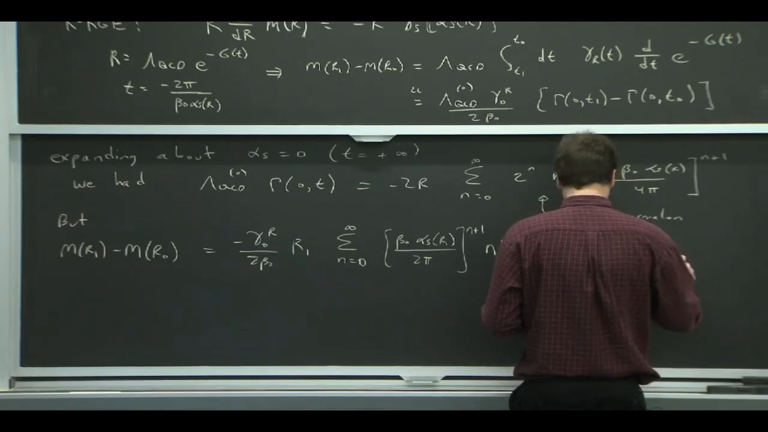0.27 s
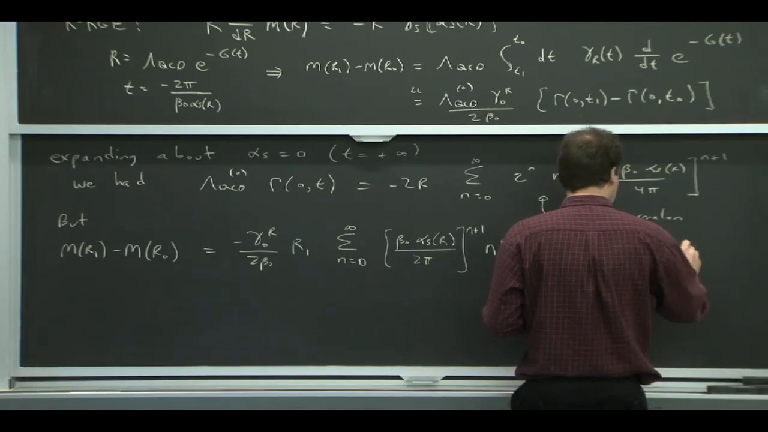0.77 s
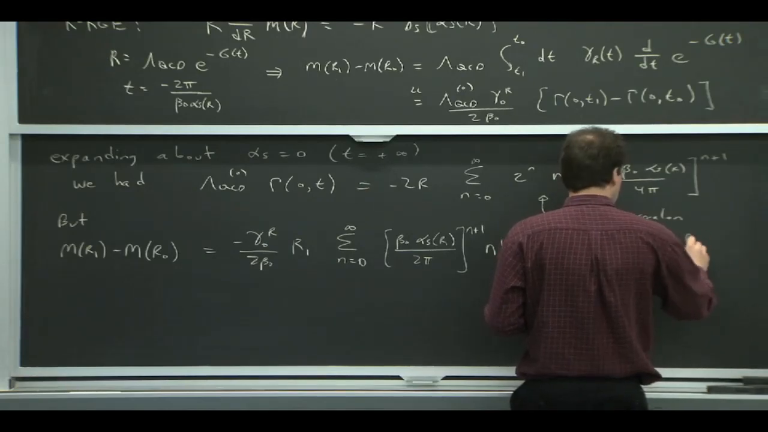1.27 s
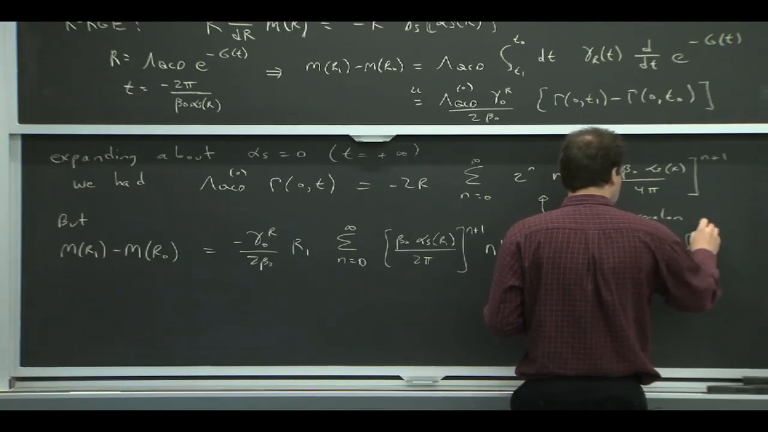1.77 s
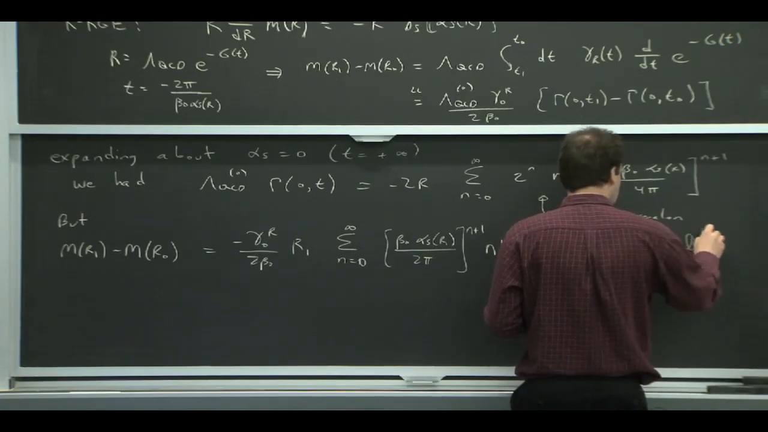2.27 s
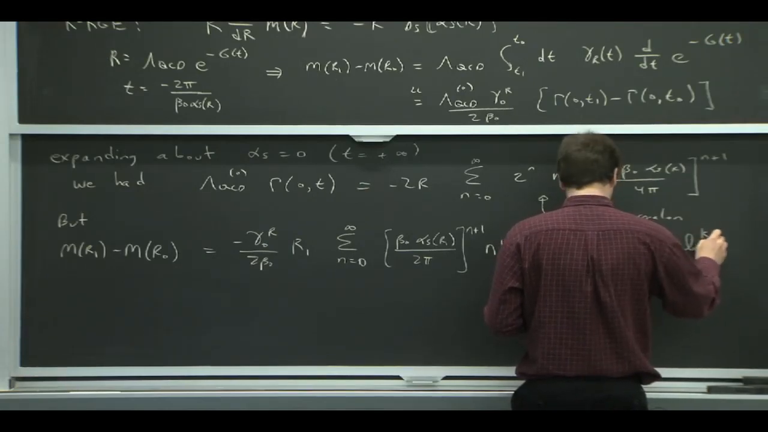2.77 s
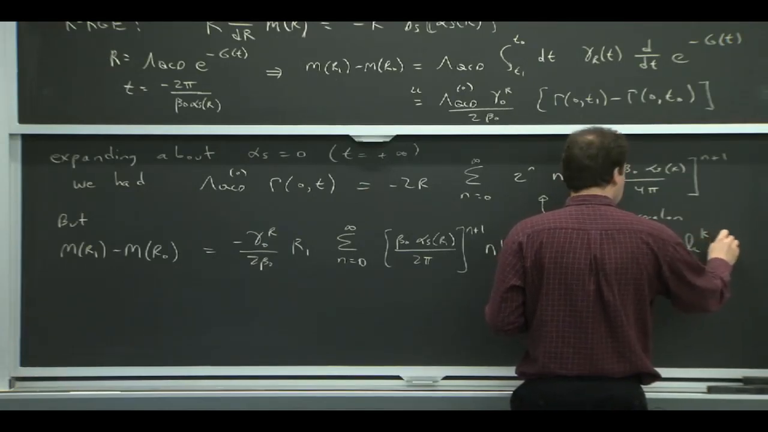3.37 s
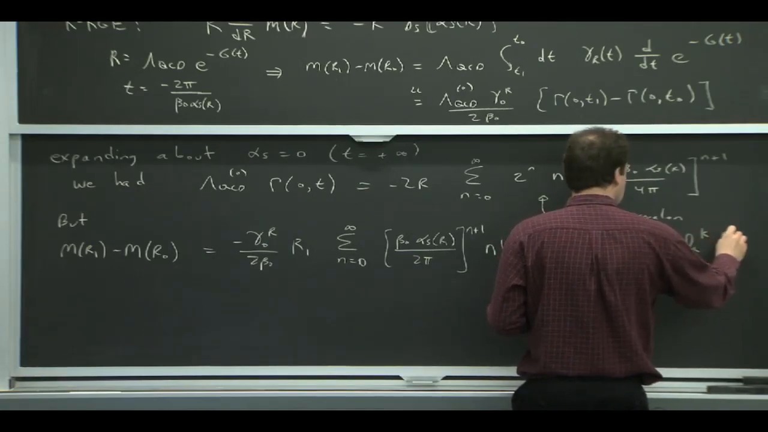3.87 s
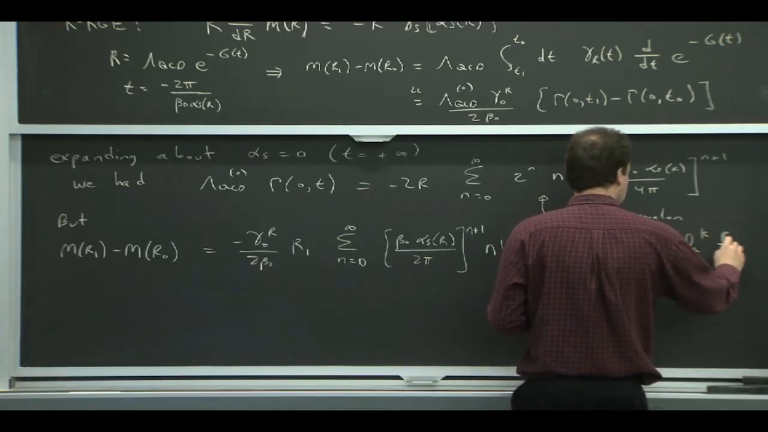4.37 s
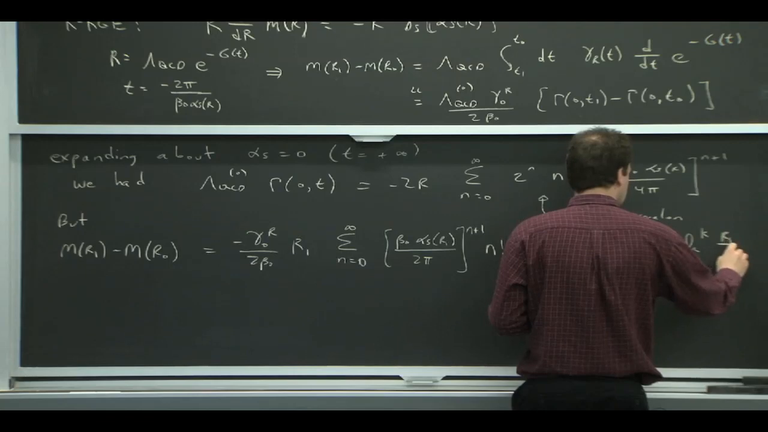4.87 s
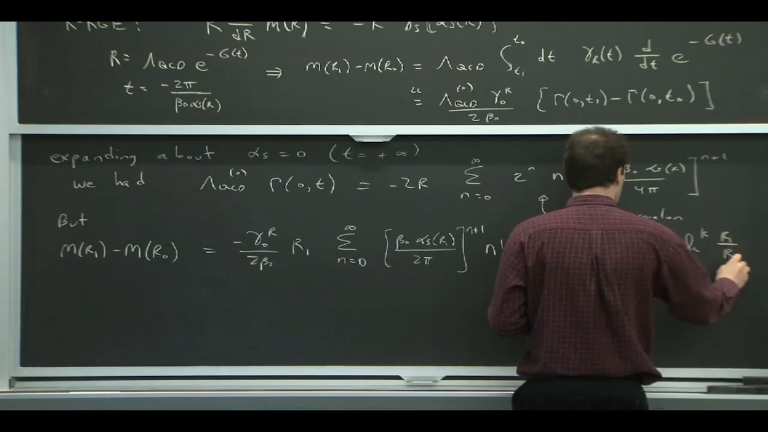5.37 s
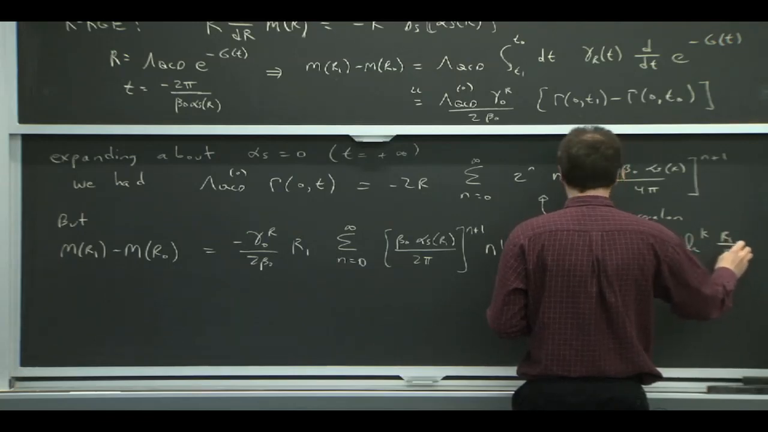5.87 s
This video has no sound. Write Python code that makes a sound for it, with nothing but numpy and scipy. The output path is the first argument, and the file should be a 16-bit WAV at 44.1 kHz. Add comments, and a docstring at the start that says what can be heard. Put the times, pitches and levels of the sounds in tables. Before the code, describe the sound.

Soft ventilation rumble with a faint, low wavering hum runs throughout a quiet lecture room. Right at 0 s chalk lands on a large blackboard with a loud, full, hollow knock, the panel shuddering briefly and the room giving a short tail. Quiet until a weaker tap at 0.85 s, followed by faint dry scraping strokes to about 1.65 s, with a low judder beneath. Two crisp knocks come at 1.86 and 2.1 s, each with a short soft rasp, ending near 2.3 s. After a pause, a brighter tap at 3.26 s leads into scratches with a tiny squeak, until 3.8 s. Knocks at 3.9, 4.13 (the loudest of this group) and 4.4 s each drag into short gritty strokes; small quick rasps continue to 5.2 s. Then only barely audible powdery brushes near 5.5 and 6.05 s over the ventilation.

```python
"""Ventilation hums softly in a quiet lecture room, and a stick of chalk knocks on a large blackboard.
The stick lands several times, each knock a filtered click with panel rings, shudder and gritty hiss.
Between landings it rasps through short strokes: random tiny slips, coloured and mixed with powder hiss.
Brief judders and squeaks are noise through narrow resonances; the room answers with a short tail.
The ventilation is coloured noise with one wavering hum."""
import sys
import numpy as np
from scipy import signal
from scipy.fft import rfft, irfft
from scipy.io import wavfile
from scipy.ndimage import uniform_filter1d

SR = 44100
rng = np.random.default_rng(int(sys.argv[2]) if len(sys.argv) > 2 else 0)


def to_wav(s):
    """Save 16-bit WAV."""
    ch = np.atleast_2d(s).T  # columns
    pcm = np.round(np.clip(ch, -1, 1) * 32767)  # PCM
    wavfile.write(sys.argv[1], SR, pcm.astype(np.int16))


N = 270333

# How long the lecture room rings. Each row: frequency in Hz, time to fall by 60 dB in seconds.
ROOM_DECAY = [(120, 0.72), (400, .5), (1000, 0.48), (3000, 0.45), (7000, 0.5), (14000, 0.16)]


def amp(db):
    """Decibels to gain."""
    return 10 ** (np.asarray(db) / 20)


def evened(x):
    """Scales to rms 1."""
    return x / np.sqrt(np.mean(x ** 2) + 1e-20)


def read(points, hz):
    """Reads a table on a log-frequency axis."""
    f, value = np.transpose(points)
    return np.interp(np.log(hz + 1), np.log(f + 1), value)


def add(mix, s, sound):
    """Mixes a sound in at time s, in seconds."""
    part = mix[max(round(s * SR), 0):][:len(sound)]
    part += sound[:len(part)]


def coloured(x, points):
    """Shapes the spectrum of x by the gains in points."""
    spectrum = rfft(x)
    gain = amp(read(points, np.fft.rfftfreq(len(x), 1 / SR)))
    return irfft(spectrum * gain, len(x))


def resonate(x, hz, width_hz):
    """One resonance with gain 1 at its peak."""
    b, a = signal.iirpeak(hz, hz / width_hz, fs=SR)
    return signal.lfilter(b, a, x)


def sing(x, hz, width_hz):
    """A steep resonance driven by x, made of two peaks in series, at rms 1."""
    narrow = resonate(x, hz, width_hz)
    return evened(resonate(narrow, hz, 2 * width_hz))


def ventilation(air_db=-54, hum_hz=113, hum_filter_width_hz=20, hum_db=-57.5):
    """Air rumbles in the ducts, with one wavering hum: noise through the same resonance twice."""
    # Colour of the duct air. Each row: frequency in Hz, relative level in dB.
    air_colour = [(15, -30.5), (35, -4), (55, -4.5), (100, 0), (160, -6), (220, -10), (300, -12.5),
                  (400, -20), (600, -26.5), (1000, -32.5), (2000, -39.5), (5000, -44), (14000, -49.5),
                  (14700, -66)]
    air = evened(coloured(rng.standard_normal(N), air_colour))
    hum = resonate(rng.standard_normal(N), hum_hz, hum_filter_width_hz)
    hum = evened(resonate(hum, hum_hz, hum_filter_width_hz))
    return amp(air_db) * air + amp(hum_db) * hum


def pulse(spectrum_db, size=4096):
    """The causal minimum-phase click whose spectrum is the function spectrum_db(Hz)."""
    hz = abs(np.fft.fftfreq(size, 1 / SR))
    log_gain = np.log(amp(spectrum_db(hz)))
    # the Hilbert transform of the log gain gives the phase
    response = np.exp(np.conj(signal.hilbert(log_gain)))
    return np.fft.ifft(response).real[:size // 2]


def tail(t60, onset_s, size=256):
    """Dense echoes of random sign and energy 1, each band dying at its own speed, after a delay."""
    impulses = rng.choice([-1., 1.], SR) * (rng.random(SR) < 1 / 2)
    hz, t, bands = signal.stft(impulses, SR, nperseg=size)
    decay = amp(-60 * t / read(t60, hz)[:, None])
    echoes = signal.istft(bands * decay, SR, nperseg=size)[1]
    return np.r_[np.zeros(round(onset_s * SR)), echoes / np.linalg.norm(echoes)]


def crumble(decay_s=0.0054, length_s=.04):
    """The tip crushes on landing: a few milliseconds of gritty hiss, noise that decays exponentially."""
    # Colour of the grit. Each row: frequency in Hz, relative level in dB.
    grit_colour = [(300, -12), (2500, 11), (4200, -2), (6500, -0.5), (9000, -6.5), (15000, -16.5)]
    t = np.arange(round(length_s * SR)) / SR
    grit = evened(coloured(rng.standard_normal(len(t)), grit_colour))
    return grit * np.exp(-t / decay_s)


def taps(thump_hz=270, thump_octaves=0.41, treble_hz=2000, bend_width_hz=900, ring_width_hz=150,
         frame_echo_gain=-1.79, bend_delay_s=0.00344, bend_gain=5.37,
         spread_gain=0.52, radiate_hz=1750, radiate_db=-5, shudder_db=-8.5, wet_db=-13.5, crumble_db=-36):
    """Each landing pushes the panel; a frame echo and a bending wave follow, then shudder and room."""
    # Chalk landing on the board. Each row: start in seconds, knock peak in dB, low thump in dB,
    # treble tilt in dB, frame echo delay in seconds, bending wave in Hz, panel ring in Hz, ring gain in dB.
    landings = [ (.0088, -10.5, 13.5, 9, 0.0017, 1054, 1136, -3),
                (0.8464, -17.5, 5.5, -0.5, 0.0018, 1490, 840, 0),
                (1.861, -11, 3, -5, 0.0017, 1130, 1030, -9.5),
                (2.1045, -10.5, 0, 2, .0017, 1214, 1010, -6.5),
                (3.2574, -11.5, -1.5, 4.5, 0.0014, 1480, 843, -3.5),
                (3.8897, -10.5, 2, 4.5, 0.001248, 1420, 806, -3.5),
                (4.1266, -8, 0.5, 3, .0015, 1200, 1110, -4.5),
                (4.3967, -12, 0, 6.5, .0013, 1250, 1110, -19)]
    # Colour of the push. Each row: frequency in Hz, relative level in dB.
    knock_colour = [(30, -18), (130, -8), (250, -4.5), (450, -1.5), (800, 4), (1400, -6), (2000, -14),
                    (3000, -21.5), (4200, -32), (6500, -41), (9000, -58.5), (15000, -65.5)]
    # Low panel modes that every landing rings. Each row: frequency in Hz, width in Hz, gain in dB.
    panel_modes = [(264.6, 35, -6), (379, 50, -5.5), (595, 60, -4.5), (937, 90, -14)]
    # How long the panel shudders. Each row: frequency in Hz, time to fall by 60 dB in seconds.
    panel_decay = [(150, 0.23), (900, 0.083), (3000, 0.0834), (12000, 0.067)]
    out = np.zeros(N)
    for s, peak_db, thump_db, treble_db, echo_s, bend_hz, ring_hz, ring_db in landings:
        def push_spectrum(hz):
            """The knock's colour with this landing's own thump and treble."""
            treble = treble_db * hz ** 2 / (hz ** 2 + treble_hz ** 2)
            thump = thump_db * np.exp(-(np.log2((hz + 1) / thump_hz) / thump_octaves) ** 2)
            return read(knock_colour, hz) + treble + thump

        push = pulse(push_spectrum)
        wave = resonate(push, bend_hz, bend_width_hz)
        wave = resonate(wave, bend_hz, bend_width_hz)
        # the spot that is struck sets the echo delay and decides which panel mode rings
        knock = push.copy()
        add(knock, echo_s, frame_echo_gain * push)  # the frame sends the push back inverted
        add(knock, bend_delay_s, bend_gain * wave)  # the slower bending wave comes later
        knock = knock + amp(ring_db) * resonate(knock, ring_hz, ring_width_hz)
        knock = knock + sum(amp(db) * resonate(knock, hz, width) for hz, width, db in panel_modes)
        knock *= amp(peak_db) / abs(knock).max()
        add(out, s, knock)
        add(out, s, amp(peak_db + crumble_db + treble_db / 2) * crumble())
        # the whole panel radiates the same energy, more evenly coloured, into its frame and the room
        spread = push + spread_gain * wave
        spread = spread + amp(radiate_db) * resonate(push, radiate_hz, bend_width_hz)
        spread *= np.linalg.norm(knock) / np.linalg.norm(spread)
        shudder = signal.fftconvolve(spread, tail(panel_decay, onset_s=.004))
        add(out, s, amp(shudder_db) * shudder)
        reverb = signal.fftconvolve(spread, tail(ROOM_DECAY, onset_s=.012))
        add(out, s, amp(wet_db) * reverb)
    return out


def contact(length_s, fade_s):
    """The pressure of one stroke: it builds, holds and lets go."""
    total_s = length_s + fade_s
    fade_share = min(2 * fade_s / abs(total_s), 1)
    return signal.windows.tukey(max(round(total_s * SR), 2), fade_share)


def spot(x, decay_s=.003, echo_db=-1, length_s=.02):
    """Quick random echoes in the slate give each touched spot its own resonant colour, at rms 1."""
    t = np.arange(round(length_s * SR)) / SR
    echoes = rng.standard_normal(len(t)) * np.exp(-t / decay_s)
    echoes = echoes / np.linalg.norm(echoes)
    return evened(x + amp(echo_db) * signal.fftconvolve(x, echoes)[:len(x)])


def strokes(slips_per_s=1800, ring_width_hz=190, fade_s=0.035, grip_db=1.0, grip_s=.016,
            whistle_hz=14000, whistle_width_hz=316, whistle_db=-15):
    """The tip catches and crumbles in tiny slips that shake the panel and shed hissing dust."""
    # Chalk dragged over the slate. Each row: start in seconds, end in seconds (both at mid-fade),
    # rasp in dB, powder hiss in dB, swell from start to end in dB, panel ring in Hz, ring level in dB.
    drags = [ (0.907, 1.065, -60, -73, 6, 880, -76), (1.072, 1.133, -53.5, -66.5, 6, 850, -46),
             (1.141, 1.22, -59.5, -76, -2, 920, -60.5), (1.216, 1.284, -54, -67.5, 7, 856, -56),
             (1.28, 1.434, -60, -79.5, 1, 1320, -66.5), (1.456, 1.647, -63, -81, 4.5, 1250, -74),
             (1.888, 2.007, -63, -72, -16, 1030, -61), (2.12, 2.308, -60, -77, -2, 990, -62),
             (3.273, 3.384, -54.5, -74.5, 1, 960, -56.5), (3.443, 3.625, -58, -76.5, -1, 956, -67),
             (3.645, 3.809, -57.5, -77, 2.5, 1220, -69), (3.91, 4.007, -51, -78, -10, 1000, -61),
             (4.15, 4.253, -50, -64, -3, 1200, -69), (4.412, 4.486, -50.5, -72, -9, 900, -70),
             (4.549, 4.632, -56, -76, 3, 1250, -68), (4.646, 4.698, -52, -72.5, 7, 1220, -58),
             (4.732, 4.818, -61, -77.5, -3, 1240, -65), (4.831, 4.928, -58, -81, -2, 1230, -61.5),
             (4.988, 5.075, -61, -81, -5, 1230, -74), (5.117, 5.191, -57.5, -80, 6, 1140, -66),
             (5.2, 5.212, -77, -66, 0, 1310, -85), (5.46, 5.534, -76.5, -71, -2, 1340, -89.5),
             (6.022, 6.102, -79, -70.5, 5.5, 1400, -86.5)]
    # Colour of the rasp. Each row: frequency in Hz, relative level in dB.
    rasp_colour = [(100, 5), (300, -2), (600, 3), (1000, 8.5), (1450, 4), (2000, -4.5), (2750, -10.5),
                   (3700, -17.5), (4600, -18.5), (6300, -29), (7500, -31.5), (15000, -29.5)]
    # Colour of the powder hiss. Each row: frequency in Hz, relative level in dB.
    powder_colour = [(300, -6.5), (1500, 9.5), (4000, 6), (7000, 5.5), (9000, 0), (12000, 0), (15000, -2.5)]
    # Resonances of the rubbed stick and slate. Each row: frequency in Hz, width in Hz, gain in dB.
    scrape_modes = [(2000, 120, -7), (2680, 346, 0.5), (3300, 550, -1), (3820, 200, 1.5), (5884, 270, -2)]
    slips = (rng.random(N) < slips_per_s / SR) * rng.choice([-1., 1.], N)
    # the grip on the slate comes and goes, so the slips grow and shrink a little
    grip = evened(uniform_filter1d(rng.standard_normal(N), max(round(grip_s * SR), 1)))
    slips *= amp(grip_db * grip)
    rasp = coloured(slips, rasp_colour)
    rasp = evened(rasp + sum(amp(db) * resonate(rasp, hz, width) for hz, width, db in scrape_modes))
    powder = evened(coloured(evened(slips) + rng.standard_normal(N), powder_colour))
    # a thin whistle of the tip, its level relative to the powder hiss
    whistle = sing(rng.standard_normal(N), whistle_hz, whistle_width_hz)
    powder = powder + amp(whistle_db) * whistle
    out = np.zeros(N)
    for start, end, rasp_db, powder_db, swell_db, ring_hz, ring_db in drags:
        # the hand leans in or eases off evenly along the stroke
        pressure = contact(end - start, fade_s)
        pressure = pressure * amp(swell_db * np.linspace(-.5, .5, len(pressure)))
        first = round((start - fade_s / 2) * SR)
        span = slice(first, first + len(pressure))
        # the slate colours each stroke a little differently as the hand moves
        scrape = amp(rasp_db) * spot(rasp[span])
        scrape = scrape + amp(powder_db) * spot(powder[span])
        scrape = scrape + amp(ring_db) * sing(rasp[span], ring_hz, ring_width_hz)
        add(out, first / SR, scrape * pressure[:len(scrape)])
    return out


def judders(fade_s=.012):
    """Friction locks onto one resonance: a low shudder of the panel or a thin squeak of the stick."""
    # The dragged stick judders or squeaks. Each row: start in seconds, start of the final fade
    # in seconds (a value just before the start leaves only a blip), pitch in Hz, width in Hz, level in dB.
    locked_notes = [ (0.928, 1.287, 320, 250, -57), (0.953, 1.316, 1550, 350, -64),
                    (1.516, 1.514, 3120, 403, -64), (3.28, 3.372, 1655, 350, -60.5),
                    (3.302, 3.378, 5970, 700, -76), (4.575, 4.70, 377, 200.6, -62.5)]
    out = np.zeros(N)
    for start, end, hz, width_hz, db in locked_notes:
        tone = sing(rng.standard_normal(SR), hz, width_hz)
        pressure = contact(end - start, fade_s)
        add(out, start, amp(db) * pressure * tone[:len(pressure)])
    return out


def room(x, wet_db):
    """The direct sound and the lecture room's tail."""
    reverb = signal.fftconvolve(x, tail(ROOM_DECAY, onset_s=0.011))[:N]
    return x + amp(wet_db) * reverb


def scene():
    """Chalk on the board, in the room, over the ventilation."""
    dragging = room(strokes() + judders(), wet_db=-10.5)
    # the landings already carry their own room tail
    mix = ventilation() + taps() + dragging
    return mix[None]


def record(dry, edge_hz=15150):
    """A steep low-pass takes away everything above the band edge."""
    low_pass = signal.firwin(511, edge_hz, window=("kaiser", 9), fs=SR)
    return signal.oaconvolve(dry, low_pass[None], "same")


dry = scene()
out = record(dry)
to_wav(out)
```